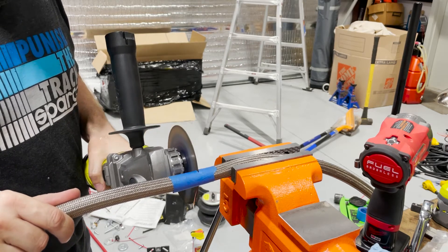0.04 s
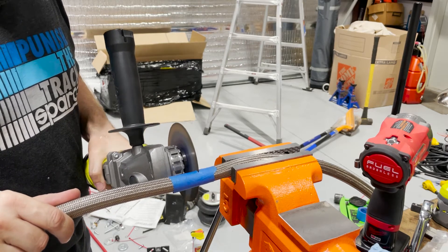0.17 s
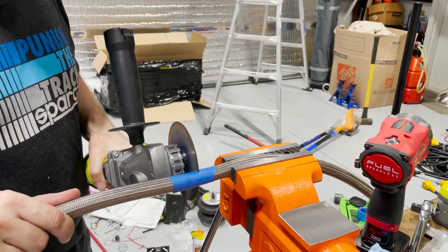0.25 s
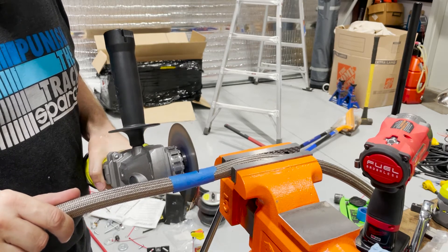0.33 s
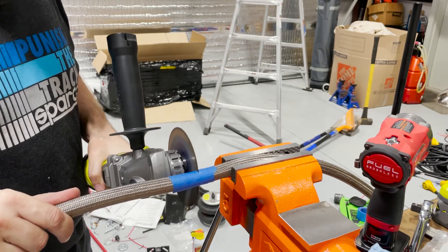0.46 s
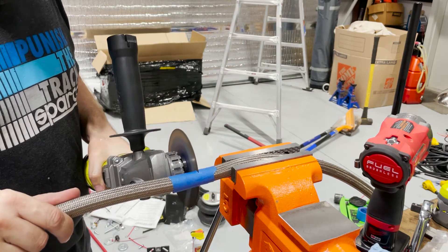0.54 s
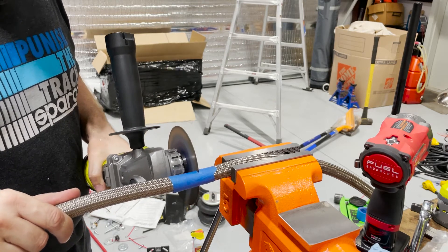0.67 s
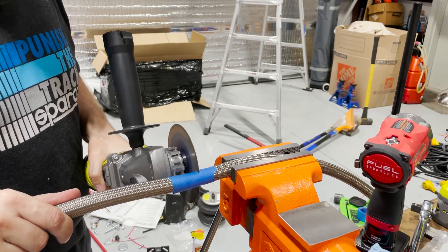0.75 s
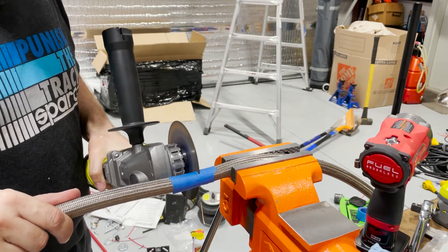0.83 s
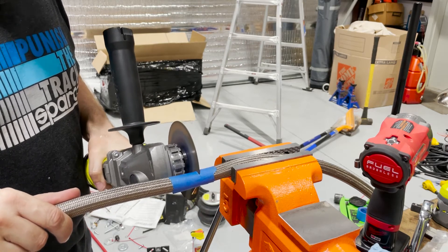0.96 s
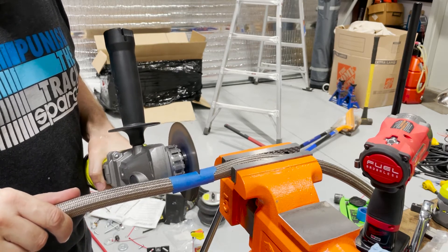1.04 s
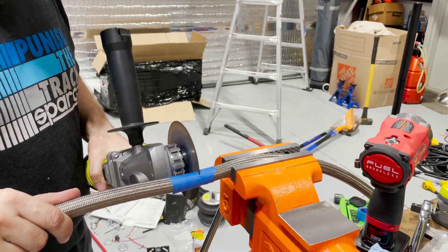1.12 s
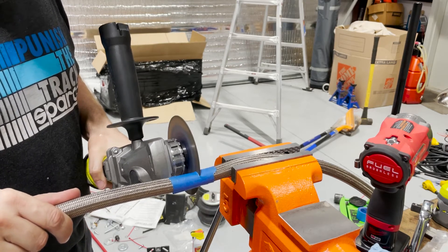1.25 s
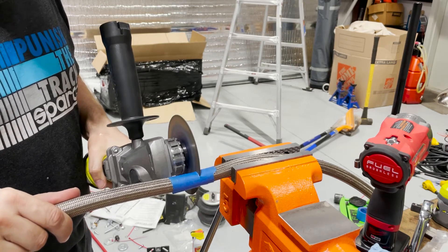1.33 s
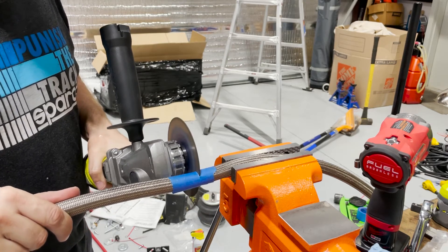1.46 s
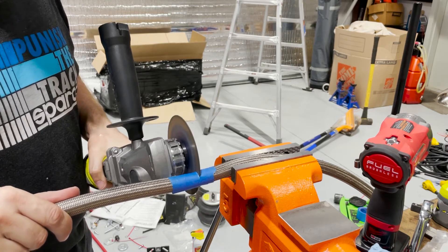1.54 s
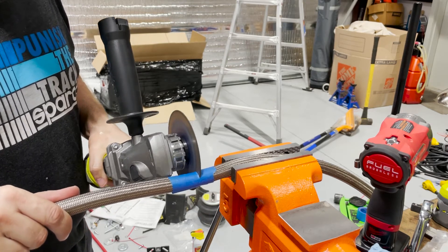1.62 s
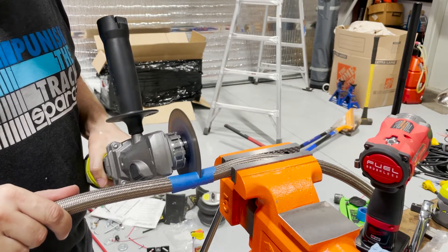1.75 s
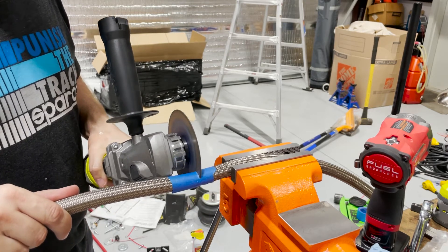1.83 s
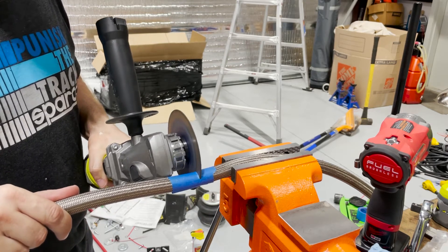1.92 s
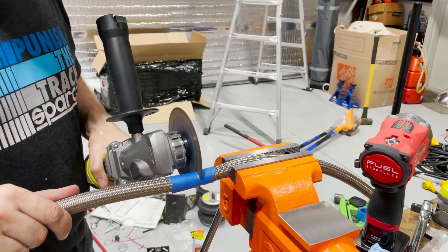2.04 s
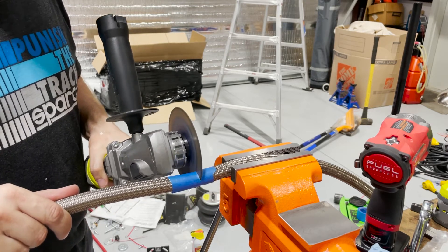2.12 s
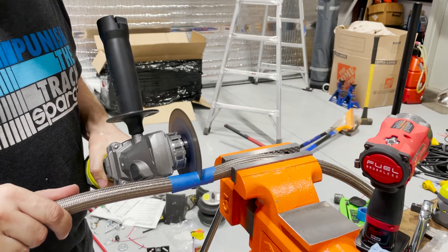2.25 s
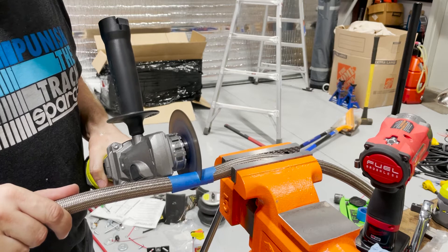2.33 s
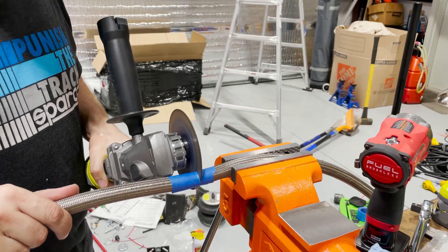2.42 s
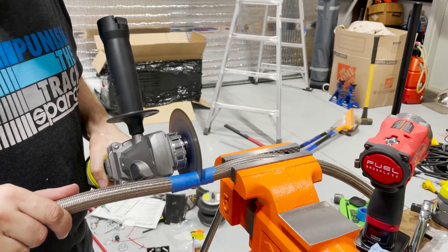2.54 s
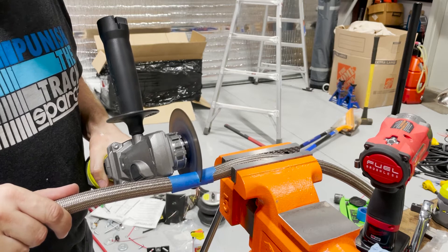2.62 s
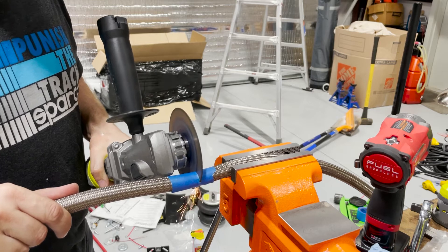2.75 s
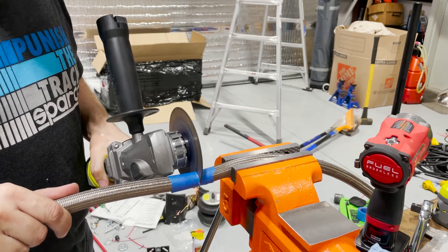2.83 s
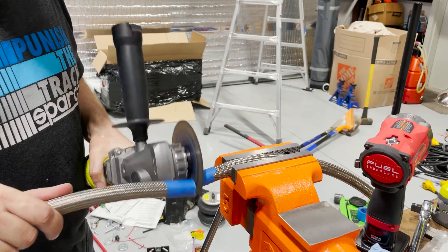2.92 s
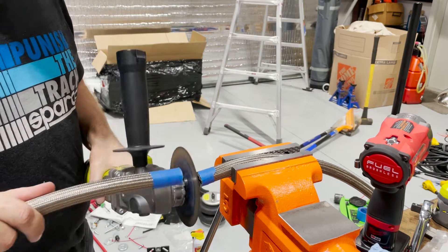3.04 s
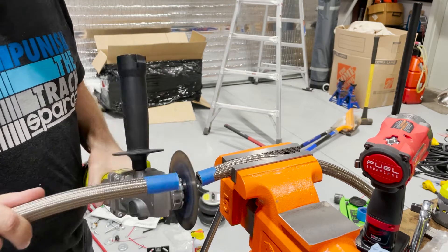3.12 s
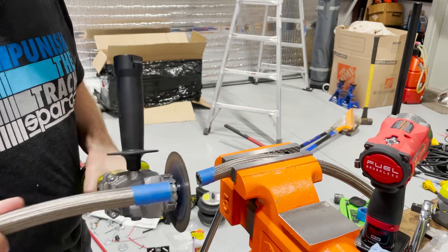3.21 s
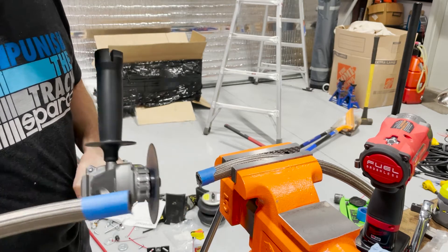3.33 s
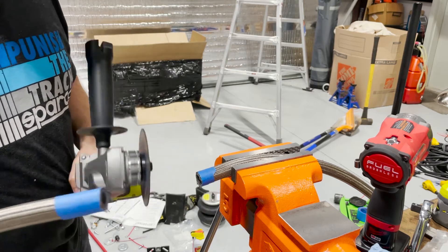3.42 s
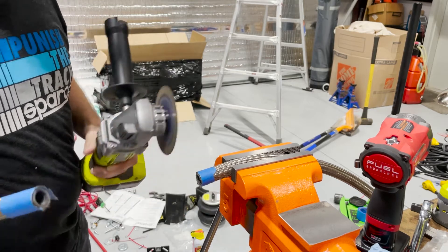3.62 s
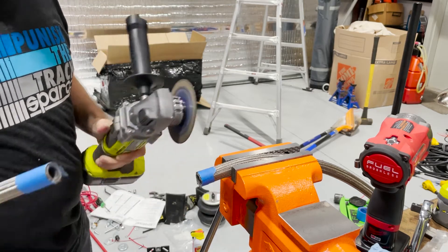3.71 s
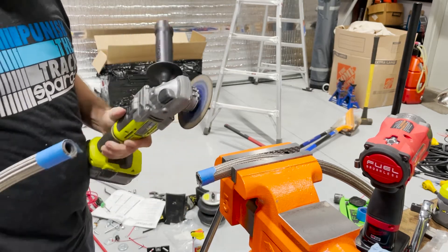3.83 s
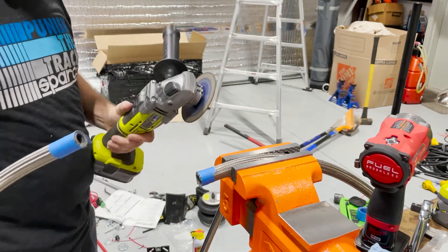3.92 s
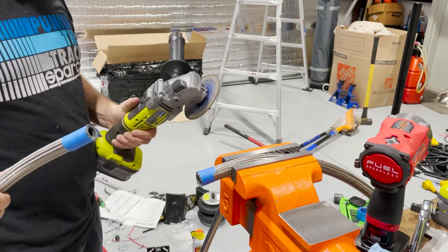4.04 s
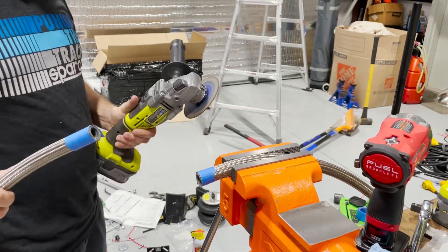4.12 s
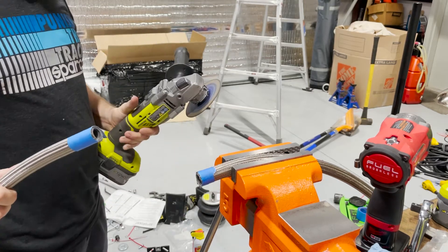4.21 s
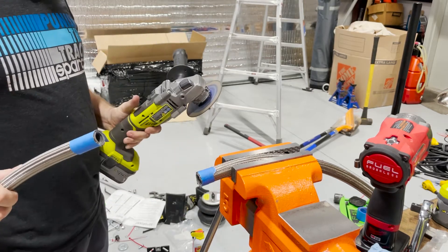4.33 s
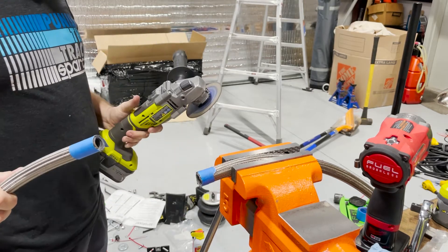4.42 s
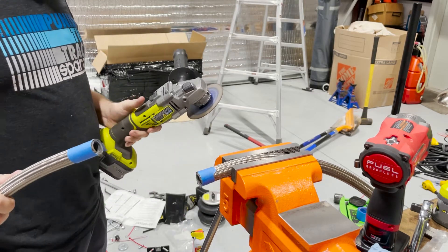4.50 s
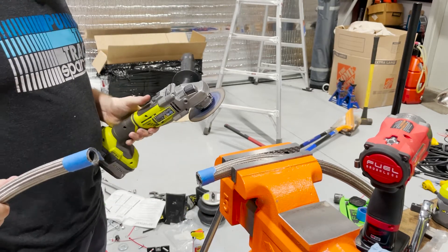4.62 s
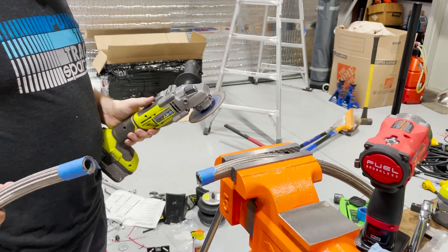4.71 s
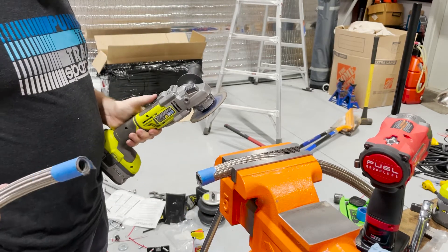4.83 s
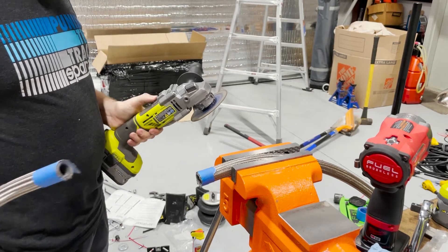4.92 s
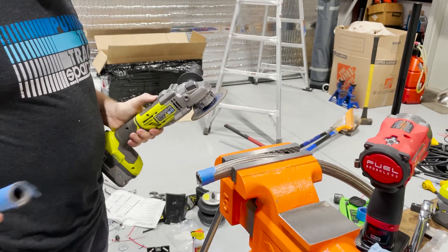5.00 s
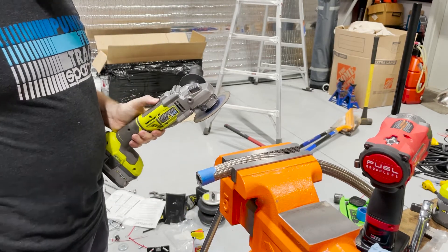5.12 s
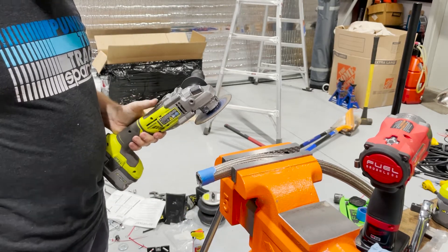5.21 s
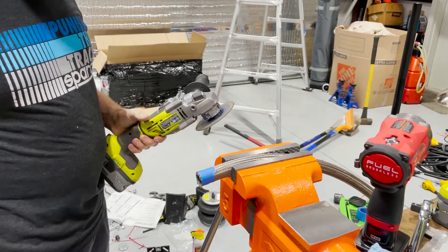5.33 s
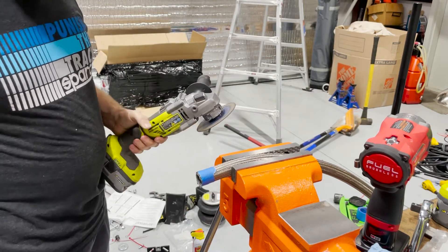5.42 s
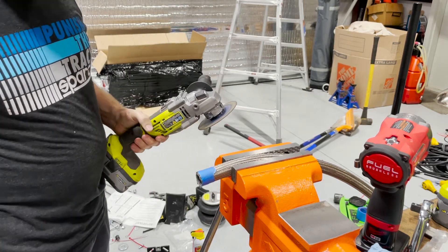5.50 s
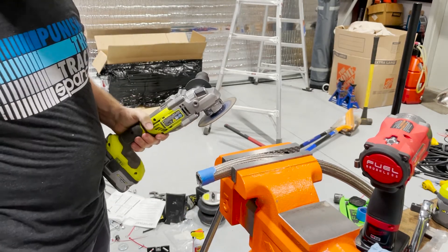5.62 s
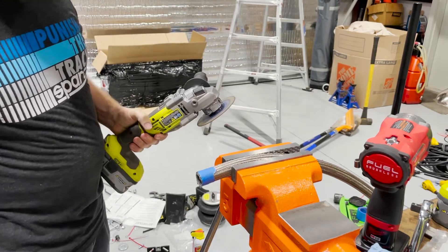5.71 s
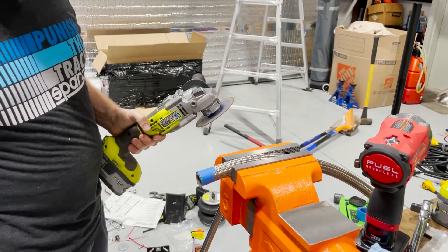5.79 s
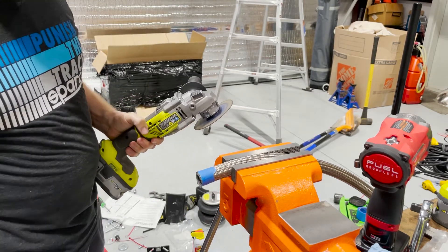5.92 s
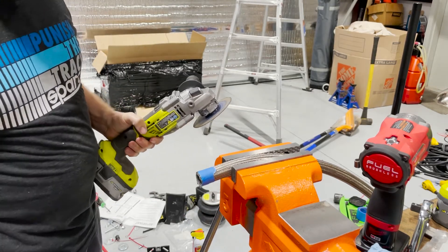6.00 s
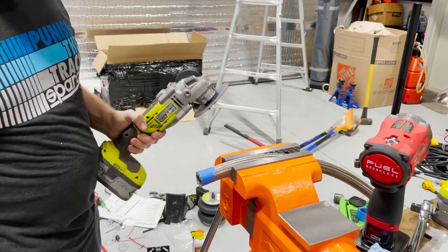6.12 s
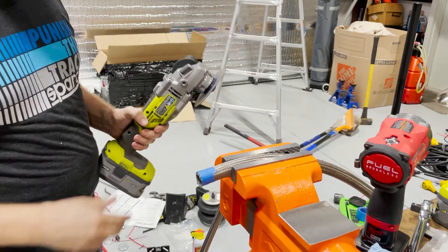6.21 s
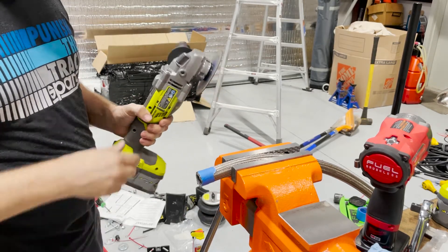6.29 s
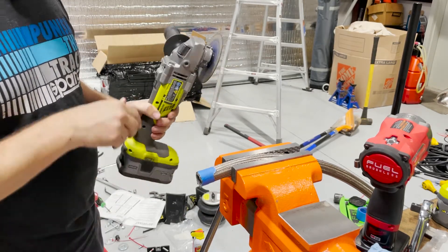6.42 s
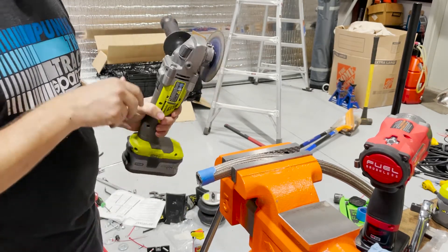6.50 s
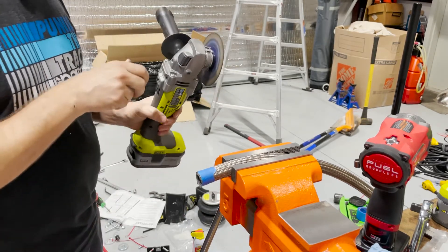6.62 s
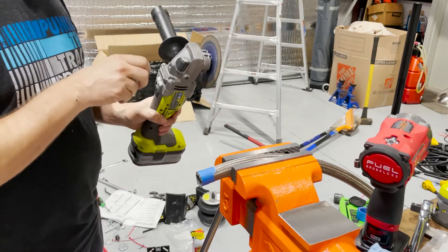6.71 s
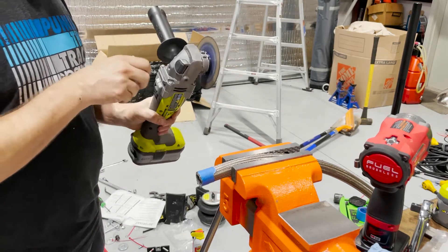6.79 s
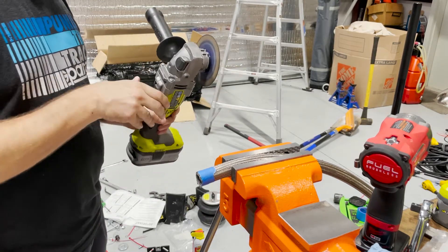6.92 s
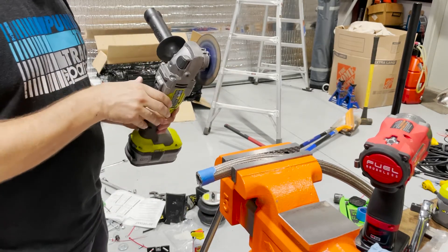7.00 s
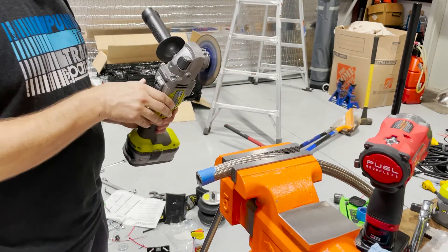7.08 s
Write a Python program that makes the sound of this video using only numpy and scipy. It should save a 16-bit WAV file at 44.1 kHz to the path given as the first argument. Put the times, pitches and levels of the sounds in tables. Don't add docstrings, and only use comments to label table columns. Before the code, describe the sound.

A cordless angle grinder grinds harshly through braided steel hose, breaks free with a brief yelp, runs at full speed, then coasts down rattling.

```python
import sys
import numpy as np
from scipy import signal
from scipy.fft import rfft, irfft
from scipy.io import wavfile
from scipy.ndimage import uniform_filter1d, map_coordinates

SR = 44100
rng = np.random.default_rng(int(sys.argv[2]) if len(sys.argv) > 2 else 0)


def gain_from_decibels(decibels):
    exponent = np.asarray(decibels, float) / 20
    return 10 ** exponent


def waveform_to_disk(signal):
    frames = np.transpose(np.atleast_2d(signal))
    scaled = np.clip(frames, -1, 1) * 32767
    samples = np.round(scaled).astype(np.int16)
    wavfile.write(sys.argv[1], SR, samples)


N = 315298
T = np.arange(N) / SR

THROUGH_S, CUT_END_S, OFF_S = 2.9, 3.06, 5.2

# time in seconds, wheel turns in Hz.
LOADED = np.array([(0.0, 124.5), (0.17, 127.3), (0.27, 120.9), (0.39, 121.9), (0.56, 126.7), (0.73, 125.9),
          (0.83, 116.6), (0.89, 115.2), (1.12, 117.2), (1.21, 115.6), (1.28, 113), (1.53, 112.4),
          (1.66, 107.9), (1.91, 110.6), (2.16, 106.1), (2.37, 110.3), (2.5, 110.7), (2.9, 103.8)])
GEAR_TEETH, RATIO = 40, 2.5
JUDDER = .0022
IDLE_HZ, CREEP_HZ_PER_S, RECOVER_S = 358.2, .5, .085
FRICTION_HZ, DRAG_S = 115, 2.275

# frequency in Hz, level in dB per Hz.
GARAGE = [(12, -46), (20, 1), (157, 12.5), (265, -31), (398, 13), (500, -18), (650, -43), (1100, -120)]
GARAGE_DB = -76.5

# time in seconds, level in dB.
BITE = [
    (0.0, -23.5),
    (0.46, -27.5),
    (0.74, -22),
    (0.76, -24),
    (1.97, -25),
    (2.14, -27.5),
    (2.39, -24.5),
    (2.83, -27.5),
    (2.9, -28),
]
USUAL_BITE_DB, LET_GO_DB_PER_S = -25.5, 249
BITE_FOLLOW = (0.8, 0.97, 0.044)
# drone, ring, hiss in dB.
OUTER_DB = (-12, 0.5, -7)
# drone, ring, hiss in dB.
DEEP_DB = (-16.5, -0.5, -9)
# drone, ring, hiss in dB.
SNAG_DB = (-41, -29.5, -35.5)
SNAG_S, SNAG_RISE_S, SNAG_FALL_DB_PER_S = 2.978, 0.016, 380
STAGES_S = (.75, .85, 1.5, 1.65)

# dB under the wheel ring on the outer braid, in the liner, deep in the cut.
RIM = [(-54.5, -53, -56.5), (-52, -47.5, -45.5), (-51, -48, -50.5), (-45.5, -47, -46.5), (-32, -33.5, -33),
       (-49, -39, -39.5), (-42.5, -42, -39), (-44, -41.5, -40.5), (-48, -37.5, -37.5), (-26, -39.5, -33),
       (-29, -41, -40), (-28.5, -28.5, -28), (-43, -33, -32), (-22.5, -36, -43), (-31, -32.5, -40),
       (-46, -36, -41), (-33, -40, -35), (-27, -42, -33), (-25, -41, -39), (-15.5, -33.5, -32),
       (-31, -35, -42), (-28, -32, -33), (-27, -29, -25.5), (-13.5, -21, -23), (-10, -22, -24.5),
       (-17.5, -18.5, -30), (-12.5, -14, -26), (-15.5, -11.5, -23), (-18, -8.5, -9), (-19.5, -9, -11),
       (-20, -15, -16), (-13.5, -19.5, -12.5), (-25.5, -12.5, -11.5), (-27, -34, -26), (-33, -24, -22.5),
       (-22, -21, -14), (-35, -31, -22), (-28, -32, -28), (-24, -38, -35), (-45, -40, -34), (-30, -36, -23),
       (-35, -35, -30), (-33, -33, -19)]
# time in seconds, frequency in Hz, lift in dB.
STEERED = [(0, 3100, 3.5), (.15, 3100, 4), (.25, 3730, 7.5), (.42, 3660, 10.5), (.6, 3230, 3.5),
           (.9, 3260, 4.5), (1.1, 3400, 0.5), (1.35, 3314, 3.5), (1.9, 3229, 0.5), (2.15, 3701, -7.5),
           (2.45, 3487, 3.5), (2.9, 3504, 8.5)]

# frequency in Hz, level in dB per Hz.
OUTER_BRAID = [(59, -67), (100, -41), (441, -37), (605, -25.5), (814, -29.5), (1750, -10.5), (1980, -18.5),
               (3090, -1.5), (3990, -4.5), (5360, -25), (7850, -14.5), (15800, -21.5)]
# frequency in Hz, level in dB per Hz.
DEEP_CUT = [(59, -63), (100, -40), (490, -36.5), (544, -26), (1140, -23.5), (1350, -6.5), (2070, -25),
            (3230, -6), (4530, -14.5), (5360, -25), (7690, -8.5), (15800, -23)]
# change of time in seconds, of drone, ring, hiss in dB.
GRIT_SHARE_DB = [0, -5.5, -6.5, 0]
# frequency in Hz, width in Hz, dB over the hiss.
WHEEL_RINGS = [(6070, 330, 6), (7660, 260, 3.5), (7800, 650, -1.5), (10940, 240, 10.5), (12000, 400, 1.5),
               (12900, 300, -1), (12540, 400, -3.5), (14800, 350, 3), (16000, 900, 6.5)]
BAND_EDGES_HZ = (2200, 5200)
# time in seconds, level in dB.
SPARKS = [
    (0.0, -44),
    (0.05, -52),
    (0.22, -42),
    (0.56, -56),
    (0.78, -40.5),
    (1.01, -41),
    (2.38, -38),
    (2.88, -37),
    (2.9, -42),
]
USUAL_SPARKS_DB, SPARKS_HZ = -42, 11000

# frequency in Hz, width in Hz, lift in dB.
GEARBOX = [(4386, 475, 20.3)]
MESH_DB, YELP_DB = -49.5, 5
# time in seconds, level in dB.
LABOUR_DB = [
    (0, -70),
    (.7, -70.5),
    (.85, -82),
    (2.9, -80),
]

# frequency in Hz, level in dB per Hz.
RUNNING = [(59, -69), (100, -39), (356, -32), (965, -25.5), (1410, -9.5), (1750, -22.5), (2670, -5.5),
           (2840, -9.5), (3030, -5.5), (4820, -17.5), (5140, -26.5), (5960, -16), (6490, -19.5),
           (9110, -22.5), (15800, -48)]
# frequency in Hz, level in dB per Hz.
COASTING = [(59, -52), (100, -35), (469, -14), (544, -18), (631, -16.5), (1900, -20.5), (3230, 7.5),
            (3750, -4.5), (3980, -10.5), (7060, -20.5), (7690, -24), (8920, -29), (10300, -50.5),
            (15800, -41)]
# time in seconds, level in dB.
NEAR_DB = [
    (2.9, 17.5),
    (3.06, 6.5),
    (3.64, 4),
    (3.95, -2),
    (5.2, -5.5),
]
# low, middle, high in dB.
AIR_DB = (-51.5, -44.5, -51.5)
AIR_FOLLOW = (0.28, 0.85, 0.37)
# low, middle, high in dB.
AIR_DB_PER_HALVING = (31, 9, 15)
# low, middle, high in dB.
BEARING_DB = (-65, -60.5, -100)
BEARING_DB_PER_HALVING = 0.5

# multiple of the shaft, dB under the strongest.
MAGNET = [(4, -20.5), (8, -0.7), (9, -37), (15, -52), (17, -22), (23, -58), (24, -45), (28, -58), (32, -34),
          (40, -52)]
# multiple of the
# shaft, level in dB.
FAN = [(13, 1.7), (12, -9)]
# multiple of the shaft, level in dB.
HIGHER_TONES = [(16, -68), (20, -58), (26, -57), (39, -73)]
# multiple of the shaft, level in dB.
COAST = [(8, 7), (12, 5), (16, 1), (20, 2), (24, 1), (28, 8), (32, 7)]
# time in seconds, shaft in Hz, magnets in dB, fan blades in dB.
HELD = [
    (2.96, 313.4, -57, -56),
    (3.02, 334.0, -38, -61),
    (3.06, 344.8, -44, -52),
    (3.18, 355.5, -36, -50),
    (3.42, 358.7, -34.5, -55.5),
    (3.81, 358.7, -44, -49.5),
    (3.9, 358.9, -39, -42.5),
    (5.07, 359.4, -39, -49),
    (5.2, 359.0, -46.5, -49),
]
MAGNET_DIES_DB_PER_S, FAN_DB_PER_HALVING, FAN_IN_HOUSING = 50, 26, .3
OVERTONES_RISE_DB_PER_S, OVERTONES_FULL_S = 110, 3.12
COAST_DB, COAST_DB_PER_HALVING = -83, 5
# frequency in Hz, width in Hz, lift in dB.
HOUSING = [(3250, 400, 29), (3650, 300, 25), (2480, 250, 14), (1250, 500, 14)]
# frequency in Hz, width in Hz, lift in dB.
GUARD = [(5450, 600, 36), (8000, 500, 28)]
GUARD_DB_PER_HALVING = 45
SURGE_ORDER, SURGE_S, SURGE_DB, SURGE_DB_PER_S = 4, 3.0, -43, 70
# time in seconds, level in dB.
SHAFT_DB = [
    (2.9, -75.5),
    (4.26, -67.5),
    (5.4, -67.5),
]
# time in seconds, level in dB.
WOBBLE_DB = [
    (2.95, -84),
    (3.05, -78),
    (3.75, -74),
    (3.95, -86),
    (5.2, -86),
]
# time in seconds, frequency in Hz, level in dB.
WHEEL_HUM = [
    (2.9, 565.6, -59),
    (3.12, 583.1, -72),
    (6.34, 557, -60.5),
    (7.15, 561.6, -70.5),
]

# time in seconds, slap in dB, tilt from first to second rings in dB,
# shift of the first rings by turning the tool in Hz.
CHATTER = [
    (3.0, -34, 3.5, 350),
    (3.22, -38, 2, 400),
    (3.42, -34, -1.5, 290),
    (3.6, -38.5, 0.5, 4),
    (3.76, -40.5, 5, 100),
    (3.9, -41, -5.5, 0),
    (4.7, -37, -4, 0),
    (5.25, -35.5, -1, -5),
]
# frequency in Hz, width in Hz, level in dB.
CHATTER_RINGS = [
    [(5820, 890, 2), (6220, 250, -20), (1480, 1700, -16.5)],
    [(7800, 760, -2), (9100, 420, -14)],
]

# time in seconds, level in dB.
SNAPS = [
    (5.0978, -31),
]
# time in seconds, level in dB.
SHUDDER = [
    (5.15, -76),
    (5.27, -56.5),
    (6.0, -76),
]
# time in seconds, level in dB.
VENT = [
    (5.15, -75),
    (5.25, -55.5),
    (5.44, -52.5),
    (5.52, -69),
    (5.7, -57),
]

# time in seconds, blow
# on gear in dB, blow on housing in dB.
KNOCKS = [(5.2113, -30, -40), (5.2388, -32, -40), (5.2493, -30, -37), (5.2843, -33, -39),
          (5.3106, -33, -39), (5.319, -32, -40), (5.3385, -25.5, -33), (5.371, -33, -31),
          (5.3804, -24.5, -35), (5.3932, -28, -42), (5.4041, -32, -47), (5.4154, -32, -38),
          (5.4241, -29, -39), (5.4344, -29, -40), (5.4431, -37, -37), (5.4525, -35, -50),
          (5.4592, -30, -41), (5.4722, -32, -50), (5.4853, -34, -48), (5.492, -28, -51), (5.5048, -31, -45),
          (5.5156, -31, -49), (5.5272, -28, -48), (5.5436, -32, -48), (5.5497, -28, -46),
          (5.5667, -26, -47), (5.5836, -24, -39), (5.5985, -28.5, -41), (5.6075, -30, -48),
          (5.6282, -31, -45), (5.64, -36, -44), (5.6564, -23.5, -48), (5.6911, -23, -42),
          (5.706, -25.5, -44), (5.7195, -21.5, -38), (5.729, -28, -33), (5.7415, -30, -43),
          (5.7599, -30, -41), (5.7678, -22.5, -40), (5.781, -33, -44), (5.787, -30, -38),
          (5.8005, -27.5, -46), (5.806, -33, -40), (5.82, -26, -46), (5.8443, -33, -44), (5.851, -28, -43),
          (5.8647, -24.5, -39), (5.885, -32, -39), (5.8968, -26, -41), (5.9104, -32, -34),
          (5.9266, -31, -49), (5.9324, -24.5, -46), (5.9626, -30, -40), (5.9771, -26, -29),
          (5.9915, -27.5, -37), (6, -29, -44), (6.0248, -32, -41), (6.0372, -30, -34), (6.0486, -31, -36),
          (6.0686, -25.5, -34),
          (6.0811, -35, -48), (6.0929, -27, -41), (6.1092, -33, -32), (6.134, -30, -34),
               (6.1582, -31, -37), (6.1709, -31, -32), (6.183, -28, -37), (6.1942, -27.5, -35),
               (6.2075, -31, -33), (6.216, -37, -32.5), (6.2371, -30, -35), (6.2467, -33.5, -33),
               (6.265, -30, -30), (6.2903, -31, -33), (6.3026, -35, -29), (6.319, -29, -37),
               (6.334, -30, -33), (6.3483, -30, -38), (6.3874, -29.5, -39), (6.405, -33, -30.5),
               (6.4492, -32, -34), (6.509, -32, -32.5), (6.547, -34, -32), (6.561, -31.5, -36),
               (6.5683, -32, -34), (6.581, -36, -49), (6.597, -34, -36), (6.605, -31, -36),
               (6.6179, -41, -32), (6.6299, -33, -54), (6.6412, -33, -36), (6.648, -36, -40),
               (6.659, -38, -45), (6.6698, -36, -48), (6.6777, -31, -46), (6.686, -32, -43),
               (6.706, -35, -45), (6.7253, -38, -44), (6.7297, -39, -37), (6.7426, -34, -35.5),
               (6.8259, -33, -49), (6.835, -40, -48), (6.8544, -37, -40), (6.8624, -36, -54),
               (6.8762, -32.5, -44), (6.89, -37, -38), (6.898, -38, -48), (6.9367, -39, -38),
               (6.965, -35, -43), (6.984, -36, -42), (6.9923, -42, -39), (7.0127, -29.5, -48),
               (7.0343, -37, -45), (7.053, -39, -42), (7.0754, -42, -48), (7.0855, -30.5, -47),
               (7.0946, -38, -39), (7.116, -40, -37.5), (7.127, -31, -37), (7.1428, -38, -38),
          (5.8122, -42.5, -39), (5.8317, -36, -44), (5.8724, -40, -36), (5.949, -39, -39),
            (6.0071, -52, -39), (6.0181, -39, -35), (6.126, -34, -33), (6.1467, -38, -34),
            (6.2243, -31, -38), (6.2566, -40, -35), (6.2746, -33, -35), (6.2823, -47, -42),
            (6.3592, -39, -31), (6.3702, -39, -35), (6.377, -38, -37), (6.394, -43, -44),
            (6.4176, -37, -27), (6.4338, -37, -38), (6.4397, -41, -39), (6.4623, -37, -34),
            (6.4682, -41, -39), (6.4829, -37, -40), (6.4967, -36, -38), (6.5026, -39, -40),
            (6.5203, -40, -33), (6.529, -35, -41), (6.5337, -48, -38), (6.6972, -40, -34),
            (6.715, -44, -41), (6.7563, -39, -37), (6.7642, -39, -34), (6.7705, -40, -40),
            (6.7782, -43, -36), (6.7836, -49, -35), (6.7925, -39, -38), (6.804, -43, -42),
            (6.811, -42, -42), (6.8462, -41, -38), (6.913, -37, -37), (6.923, -38, -43),
            (6.944, -39, -38.5), (6.9541, -42, -52), (6.973, -45, -38), (7.002, -45, -45),
            (7.0206, -45, -46), (7.0414, -38, -44), (7.062, -42, -52), (7.1076, -40, -44)]
# frequency in Hz, width in Hz, level in dB.
KNOCK_RINGS = [
    [(7816, 440, -5), (8830, 474, -3.5), (9420, 280, -11), (6180, 960, -19.5), (14700, 1100, -31), (10900, 2700, -26)],
    [(2522, 315, -7), (2880, 350, -7), (3330, 337, 0.5), (3563, 340, -7), (1255, 450, -21.5), (4380, 440, -23.5)],
]


def evened(x):
    return x / np.sqrt(np.mean(x ** 2) + 1e-20)


def curve(rows, column, t=T):
    rows = np.array(rows)
    return np.interp(t, rows[:, 0], rows[:, column])


def read(points, hz):
    f, value = np.transpose(points)
    return np.interp(np.log(hz + 1), np.log(f + 1), value)


def bumps(peaks, hz):
    return sum(db / (1 + (2 * (hz - f) / width) ** 2) for f, width, db in peaks)


def fade(x):
    return np.clip(x, 0, 1)


def resonate(x, hz, width):
    turn = np.exp(2j * np.pi * np.cumsum(hz * np.ones(len(x))) / SR)
    r = np.exp(-np.pi * width / SR)
    smooth = signal.lfilter([(1 - r) ** 2], [1, -2 * r, r * r], x / turn + 1e-18)
    return 2 * (turn * smooth).real


def wander(rate, t=T):
    steps = rng.standard_normal(int(N / SR * 200) + 2)
    steps = evened(signal.lfilter([1], [1, -np.exp(-2 * np.pi * rate / 200)], steps))
    return np.interp(t * 200, np.arange(len(steps)), steps)


def colour(x, early, late, turn_s, levels, patchy_db, rings):
    hz, t, z = signal.stft(x, SR, nperseg=512, noverlap=384)
    blend = fade((t - turn_s[0]) / (turn_s[1] - turn_s[0]))
    shape_db = np.outer(read(early, hz), 1 - blend) + np.outer(read(late, hz), blend)
    shape = gain_from_decibels(shape_db + bumps(rings, hz)[:, None])
    band = np.digitize(hz, BAND_EDGES_HZ)
    for k in range(3):
        strength = np.sqrt((shape[band == k] ** 2).sum(0) / len(hz))
        shape[band == k] *= gain_from_decibels(curve(levels, k + 1, t)) / strength
    patches = uniform_filter1d(rng.standard_normal((len(t), len(hz))), size=30, axis=0)
    patches = evened(uniform_filter1d(patches, size=5, axis=1))
    return signal.istft(z * shape * gain_from_decibels(patchy_db * patches.T), SR, nperseg=512, noverlap=384)[1][:N]


def rung(blows, modes, uneven_db, shift_hz=0):
    first = np.argmax(blows > 0)
    blows, shift_hz = blows[first:], (shift_hz * np.ones(N))[first:]
    u = np.arange(100) / SR / .0003
    chance = rng.standard_normal(len(blows))
    scrape = .08 * signal.oaconvolve(blows, u * np.exp(1 - u))[:len(blows)] * chance
    out = 0
    for k, (hz, width, db) in enumerate(modes):
        uneven = blows * gain_from_decibels(uneven_db * np.roll(chance, 7 * k + 1))
        ring = resonate(uneven + scrape, hz + shift_hz, width)
        out = out + gain_from_decibels(db) * SR / (2 * width) * resonate(ring, hz + shift_hz, 3 * width)
    return np.pad(out, (first, 0))


def wheel_hz(t=T):
    idle = IDLE_HZ + CREEP_HZ_PER_S * (np.minimum(t, OFF_S) - THROUGH_S)
    lost = IDLE_HZ - RATIO * LOADED[-1][1]
    free = idle - lost * np.exp(-np.maximum(t - THROUGH_S, 0) / RECOVER_S)
    free = (free + FRICTION_HZ) * np.exp(-np.maximum(t - OFF_S, 0) / DRAG_S) - FRICTION_HZ
    return np.where(t < THROUGH_S, curve(LOADED, 1, t), free / RATIO)


def halvings(t=T):
    return np.maximum(np.log2(IDLE_HZ / RATIO / wheel_hz(t)), 0) * (t > OFF_S)


def garage():
    hz = np.fft.rfftfreq(N, 1 / SR)
    rumble = irfft(rfft(rng.standard_normal(N)) * gain_from_decibels(read(GARAGE, hz)), N)
    return gain_from_decibels(GARAGE_DB) * evened(rumble)


def grind_db():
    t = np.arange(0, CUT_END_S, .004)[:, None]
    deep = fade((t - STAGES_S[0]) / (STAGES_S[1] - STAGES_S[0]))
    bite = USUAL_BITE_DB + (curve(BITE, 1, t) - USUAL_BITE_DB) * BITE_FOLLOW
    bite = bite + (1 - deep) * OUTER_DB + deep * DEEP_DB
    bite = bite - LET_GO_DB_PER_S * np.maximum(t - THROUGH_S - .015, 0)
    rise = 20 * (SNAG_S - t) / SNAG_RISE_S
    snag = SNAG_DB - np.where(t < SNAG_S, rise, SNAG_FALL_DB_PER_S * (t - SNAG_S))
    return np.hstack([t, np.maximum(bite, snag)])


def rim(turns):
    cut = slice(0, round(CUT_END_S * SR))
    t = T[cut]
    out = np.zeros(N)
    steered = curve(STEERED, 1, t), 500, curve(STEERED, 2, t)
    for k, (outer, liner, deep) in enumerate(RIM, start=1):
        db = np.interp(t, STAGES_S, [outer, liner, liner, deep])
        db = db + bumps([steered], k * wheel_hz(t)) + 2.6 * wander(5, t)
        phase = .6 * wander(1.5, t) + .4 * rng.standard_normal()
        out[cut] += gain_from_decibels(db) * np.cos(2 * np.pi * k * turns[cut] + phase)
    return np.sqrt(2) * gain_from_decibels(curve(grind_db(), 2) - 2.5) * out * fade((2.93 - T) / 0.032)


def worn(turns):
    fresh = rng.standard_normal((int(turns[-1]) + 2, 400))
    grains = signal.lfilter([1], [1, -.9], fresh, axis=0)
    again = map_coordinates(grains, [np.floor(turns), turns % 1 * 399], order=3)
    return evened(signal.sosfilt(signal.butter(2, 2000, "high", fs=SR, output="sos"), again))


def grit(turns):
    levels = grind_db()
    levels = levels + np.outer(levels[:, 0] < SNAG_S - 2 * SNAG_RISE_S, GRIT_SHARE_DB)
    bite = 14.0 + np.exp(0.096 * (np.cos(2 * np.pi * turns) - 1))
    flicker = gain_from_decibels(0.5 * rng.standard_normal(N // 32 + 1).repeat(32)[:N])
    tear = (rng.standard_normal(N) + 1.08 * worn(turns)) * flicker * bite
    out = colour(evened(tear), OUTER_BRAID, DEEP_CUT, (.7, 1.6), levels, 1.5, WHEEL_RINGS)
    top = signal.sosfiltfilt(signal.butter(2, SPARKS_HZ, "high", fs=SR, output="sos"), out)
    out = out + (gain_from_decibels(curve(SPARKS, 1) - USUAL_SPARKS_DB) - 1) * top
    return out * fade((CUT_END_S - T) / 0.045)


def gear_mesh(turns):
    mesh = 2 * np.pi * GEAR_TEETH * turns + 0.11 * np.sin(2 * np.pi * turns)
    octave_db = np.interp(T, (1.5, 2.7), (-20, -6)) + 0.96 * wander(24)
    tone = np.cos(mesh) + gain_from_decibels(octave_db) * np.cos(2 * mesh) * (T < THROUGH_S)
    db = MESH_DB + bumps(GEARBOX, GEAR_TEETH * curve(LOADED, 1)) + 0.92 * wander(11.76)
    db = db + YELP_DB * fade((T - THROUGH_S) / .01) - 9 * fade((.5 - T) / .1)
    return np.sqrt(2) * gain_from_decibels(db) * tone * fade((2.95 - T) / 0.03)


def labour(turns):
    shake = np.cos(2 * np.pi * RATIO * turns) * fade((THROUGH_S - T) / 0.023)
    return gain_from_decibels(curve(LABOUR_DB, 1) + 2.2 * wander(5.4)) * shake


def whirr_db():
    t = np.arange(THROUGH_S, N / SR, .01)[:, None]
    air = AIR_DB + curve(NEAR_DB, 1, t) * AIR_FOLLOW - halvings(t) * AIR_DB_PER_HALVING
    bearings = BEARING_DB - halvings(t) * BEARING_DB_PER_HALVING
    power = gain_from_decibels(2 * air) + gain_from_decibels(2 * bearings) * fade((t - OFF_S) / .5)
    return np.hstack([t, 10 * np.log10(power)])


def whirr(turns):
    puffs = rng.standard_normal(N) * (1 + 0.49 * np.cos(2 * np.pi * RATIO * turns))
    out = colour(evened(puffs), RUNNING, COASTING, (5.2, 5.9), whirr_db(), 1.0, [(14400, 2500, 6.3)])
    return out * fade((T - 2.88) / 0.086)


def motor(turns):
    free = slice(round(THROUGH_S * SR), N)
    t, turns = T[free], turns[free]
    out, shaft, hz, slow = np.zeros(len(t)), RATIO * turns, RATIO * wheel_hz(t), halvings(t)
    off = fade((t - OFF_S) / 0.11)
    magnets = curve(HELD, 2, t) - MAGNET_DIES_DB_PER_S * np.maximum(t - OFF_S, 0)
    blades = curve(HELD, 3, t) - FAN_DB_PER_HALVING * slow
    blades = blades + FAN_IN_HOUSING * off * bumps(HOUSING, FAN[0][0] * hz)
    overtones = 0.3 * curve(NEAR_DB, 1, t) - 30 * slow
    overtones = overtones - OVERTONES_RISE_DB_PER_S * np.maximum(OVERTONES_FULL_S - t, 0)
    for level, family in ((magnets, MAGNET), (blades, FAN), (overtones, HIGHER_TONES)):
        for k, db in family:
            out += gain_from_decibels(level + db + 1.2 * wander(2, t)) * np.cos(2 * np.pi * (k * shaft + rng.random()))
    for k, db in COAST:
        guard = np.maximum(bumps(GUARD, k * hz) - GUARD_DB_PER_HALVING * slow, 0)
        db = db + COAST_DB - COAST_DB_PER_HALVING * slow
        db = db + bumps(HOUSING, k * hz) + guard + 4.2 * wander(9.9, t)
        out += off * gain_from_decibels(db) * np.cos(2 * np.pi * (k * shaft + rng.random()))
    surge_db = SURGE_DB - SURGE_DB_PER_S * abs(t - SURGE_S)
    out += gain_from_decibels(surge_db) * np.cos(2 * np.pi * SURGE_ORDER * shaft)
    shaft_fade = fade((SHAFT_DB[-1][0] - t) / 0.12)
    out += gain_from_decibels(curve(SHAFT_DB, 1, t)) * np.cos(2 * np.pi * shaft) * shaft_fade
    out += gain_from_decibels(curve(WOBBLE_DB, 1, t) + 2.05 * wander(9.63, t)) * np.cos(2 * np.pi * turns)
    return np.pad(np.sqrt(2) * out * fade((t - THROUGH_S) / .04), (free.start, 0))


def wheel_hum():
    ring = evened(resonate(rng.standard_normal(N), curve(WHEEL_HUM, 1), 23.0))
    return gain_from_decibels(curve(WHEEL_HUM, 2) - 4.0) * ring * (T > WHEEL_HUM[0][0])


def chatter():
    turns = rng.choice([2, 4, 5, 6, 7, 8], 200, p=[.05, .15, .45, .15, .12, .08])
    s = CHATTER[0][0] + np.cumsum((turns + .15 * rng.standard_normal(200)) / IDLE_HZ)
    s = s[s < CHATTER[-1][0]]
    out = np.zeros(N)
    for side, modes, uneven_db in zip((-1, 1), CHATTER_RINGS, (1.5, 4)):
        blows = np.zeros(N)
        blows[(s * SR).astype(int)] = gain_from_decibels(curve(CHATTER, 1, s) + side * curve(CHATTER, 2, s))
        out += rung(blows, modes, uneven_db, curve(CHATTER, 3) * (side < 0))
    return out


def snaps():
    out, t = np.zeros(N), np.arange(300) / SR
    for s, db in SNAPS:
        out[round(s * SR):][:300] += gain_from_decibels(db - 12 - 60 * t / 0.0099) * np.diff(rng.standard_normal(301))
    return out


def shudder():
    shake = evened(resonate(rng.standard_normal(N), 543, 180.7))
    return gain_from_decibels(curve(SHUDDER, 1)) * shake * (T > SHUDDER[0][0]) * fade((SHUDDER[-1][0] - T) / 0.098)


def vent():
    rush = evened(resonate(rng.standard_normal(N), 1350, 220))
    return gain_from_decibels(curve(VENT, 1)) * rush * (T > VENT[0][0]) * fade((VENT[-1][0] - T) / 0.058)


def knocks():
    s, *hard_db = np.transpose(KNOCKS)
    light = OFF_S + np.cumsum(.011 * np.clip(1 + .2 * rng.standard_normal(220), .5, 2))
    apart = abs(light[:, None] - s).min(1) > .008
    light = light[(light < N / SR - .002) & apart]
    out = np.zeros(N)
    for db, modes, under_db, level_db in zip(hard_db, KNOCK_RINGS, (-5, -2.5), (-2.5, -3.5)):
        blows = np.zeros(N)
        trend_db = np.polyval(np.polyfit(s, db, deg=3), light)
        light_db = trend_db + under_db + 3.7 * rng.standard_normal(len(light))
        blows[(light * SR).astype(int)] = gain_from_decibels(light_db)
        blows[(s * SR).astype(int)] = gain_from_decibels(db)
        out += gain_from_decibels(level_db) * rung(blows, modes, 1.8)
    return out


def walls(x):
    taps = np.zeros(SR // 2)
    at = np.arange(150, len(taps) - 20, 20) + rng.integers(0, 20, (len(taps) - 151) // 20)
    taps[at] = rng.choice([-1., 1.], len(at)) * gain_from_decibels(-60 * at / SR / 0.35)
    return signal.fftconvolve(x, taps / np.linalg.norm(taps))[:N]


def scene():
    juddering = 1 + JUDDER * wander(8) * (T < THROUGH_S)
    turns = np.cumsum(wheel_hz() * juddering) / SR
    mono = garage() + rim(turns) + grit(turns) + gear_mesh(turns) + labour(turns)
    mono += whirr(turns) + motor(turns) + wheel_hum() + shudder() + vent()
    blows = chatter() + snaps() + knocks()
    mono += blows + gain_from_decibels(-12.0) * walls(blows)
    return np.array([mono, mono])


def roll_off(x):
    return signal.sosfilt(signal.butter(12, 17090, fs=SR, output="sos"), x)


def record(dry):
    low_pass = signal.firwin(511, 15850, window=("kaiser", 9), fs=SR)
    limited = signal.oaconvolve(dry, low_pass[None], "same")
    return roll_off(limited)


dry = scene()
out = record(dry)
waveform_to_disk(out)
```